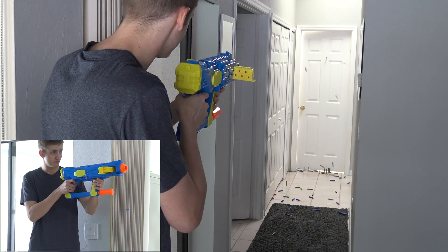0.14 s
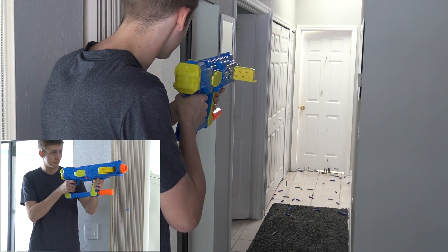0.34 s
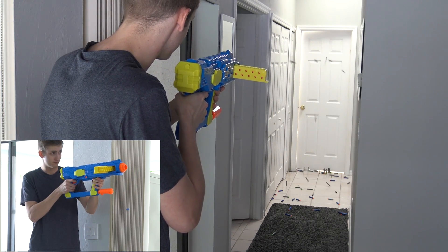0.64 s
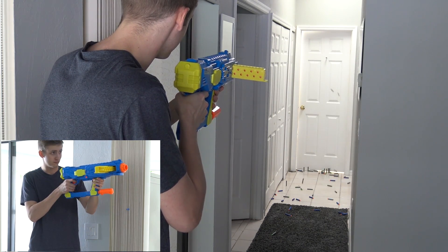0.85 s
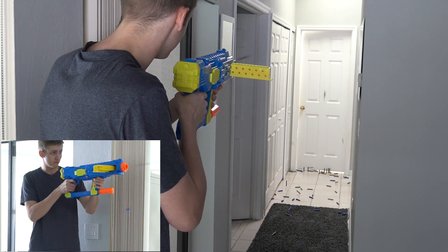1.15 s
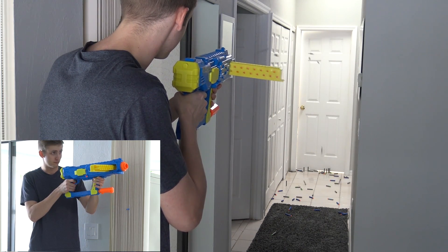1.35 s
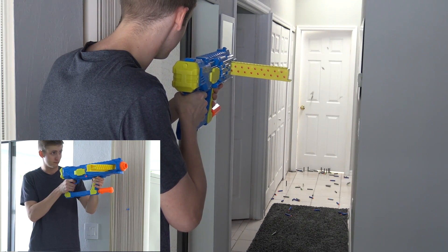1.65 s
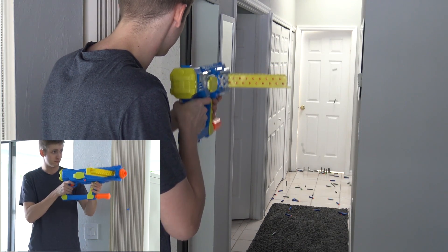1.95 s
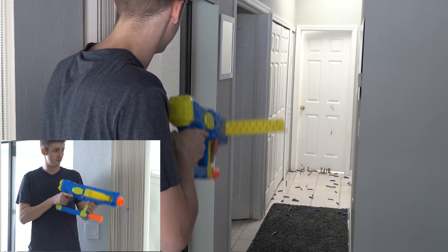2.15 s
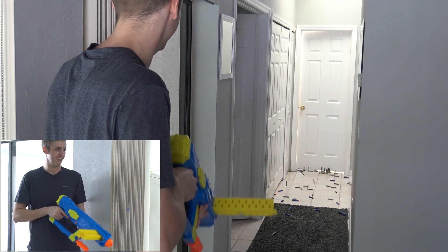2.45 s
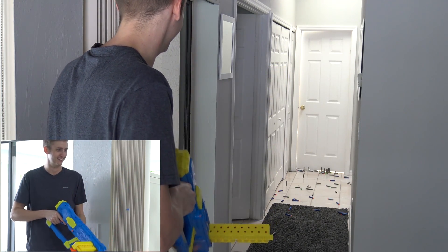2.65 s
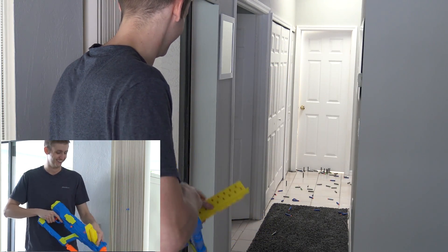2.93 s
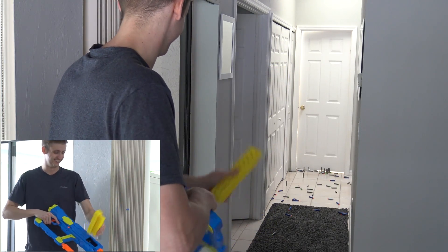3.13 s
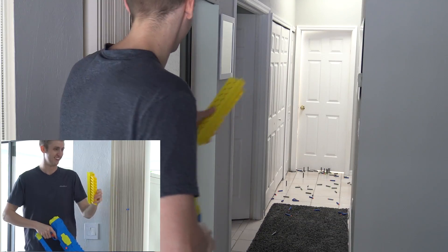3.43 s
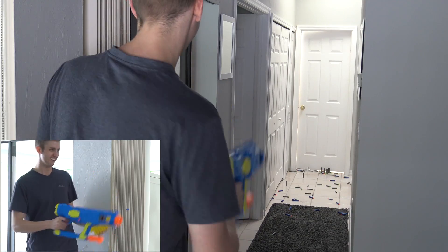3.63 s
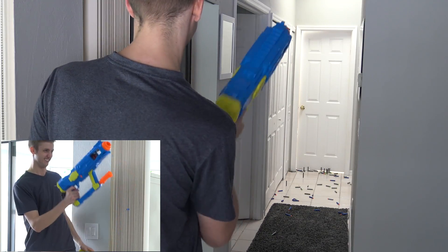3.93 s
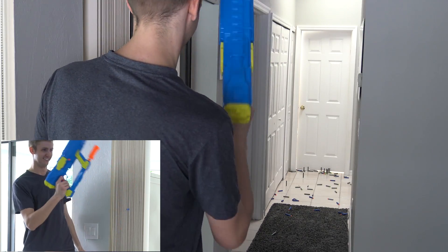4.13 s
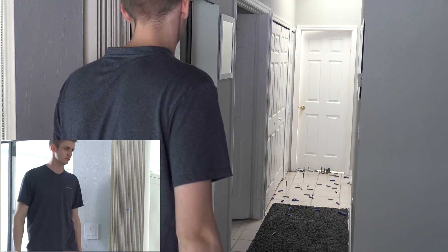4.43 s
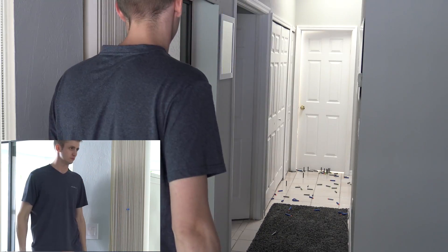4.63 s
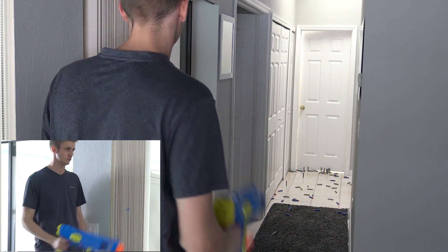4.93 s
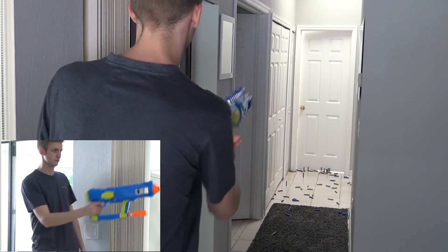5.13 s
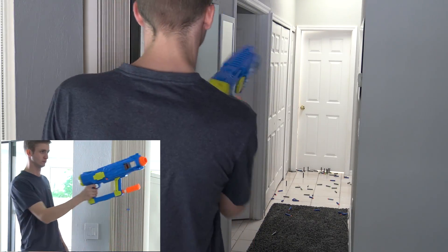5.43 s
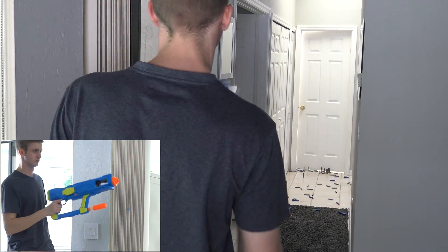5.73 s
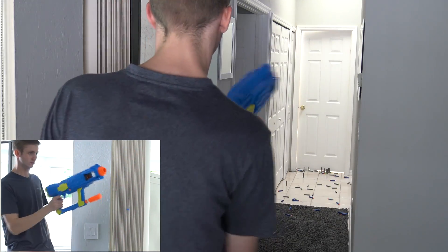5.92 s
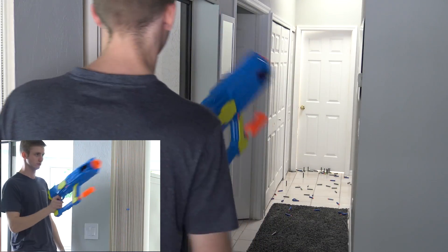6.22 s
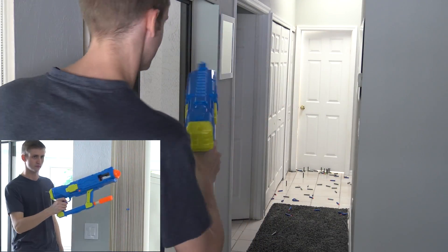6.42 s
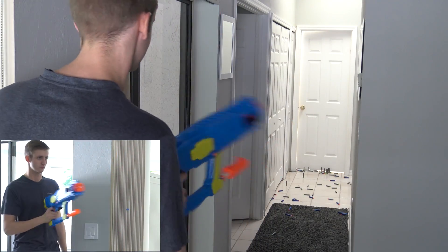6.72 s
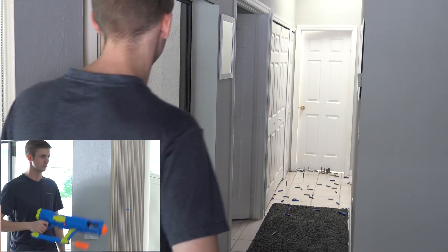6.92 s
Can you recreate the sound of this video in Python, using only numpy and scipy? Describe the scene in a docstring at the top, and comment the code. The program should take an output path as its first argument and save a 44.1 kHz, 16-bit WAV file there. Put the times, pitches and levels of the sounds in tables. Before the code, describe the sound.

Close to the microphone, a pneumatic toy blaster fires quick bursts in a bare, reverberant hallway, each shot a sharp plastic slam with an air hiss. Foam darts smack and boom on a hollow door at the far end. A magazine is pulled with hard clacks, three empty shots follow, the sound cuts abruptly to a louder hum, and then one very long, rapid dry-fire burst rattles out and leaves a ringing tail.

```python
"""Toy dart blaster in a bare hallway

A pneumatic blaster fires fast bursts of valve hiss, piston slam and low push; foam darts smack a hollow door.
Between bursts the magazine and grip clack, ping and whistle over mains hum and dull room noise.
Noise bursts excite resonances, and decaying noise bands make the hall. A limiter squeezes the shots,
so the tail swells after each one. One splice cuts the sound short, and the background steps up there."""
import sys
import numpy as np
from scipy import signal
from scipy.fft import rfft, irfft, next_fast_len
from scipy.io import wavfile

SR = 44100
rng = np.random.default_rng(int(sys.argv[2]) if len(sys.argv) > 2 else 0)


def convert_level_to_amplitude(level_db):
    """Map a level in decibels to its linear amplitude factor."""
    exponent = np.asarray(level_db, float) / 20
    return 10 ** exponent


def master_out(mix):
    """Clip the mix to full scale and print it as 16-bit PCM to the path in sys.argv[1]."""
    frames = np.transpose(np.atleast_2d(mix))
    ceiling = np.clip(frames, -1, 1)
    pcm = np.round(ceiling * 32767).astype(np.int16)
    wavfile.write(sys.argv[1], SR, pcm)


N = 311787   # length in samples
SPLICE_S = 4.503


def rms_one(x):
    """Scale to rms 1."""
    return x / np.sqrt(np.mean(x ** 2) + 1e-20)


def at_hz(points, hz):
    """Read a spectrum on a log-frequency axis."""
    point_hz, value = np.array(points).T
    return np.interp(np.log(hz), np.log(point_hz), value)


def noise(spectrum, size=N):
    """Gaussian noise shaped to a spectrum in dB per Hz, then scaled to rms 1."""
    padded = next_fast_len(size)
    hz = np.maximum(np.fft.rfftfreq(padded, 1 / SR), 1)
    white = rfft(rng.standard_normal(size), padded)
    return rms_one(irfft(white * convert_level_to_amplitude(at_hz(spectrum, hz)))[:size])


def puffs(times, db, rise_s, fall_s, hold_s=0):
    """Envelope with a straight rise, a hold and an exponential fall at each time; none passes the splice."""
    out = np.zeros(N + 4 * SR)
    rise_s, fall_s = np.maximum(rise_s, 1e-4), np.maximum(fall_s, 1e-4)
    for s, level_db, rise, fall, hold in np.broadcast(times, db, rise_s, fall_s, hold_s):
        longest_s = SPLICE_S - s if s < SPLICE_S else 3
        t = np.arange(int(min(rise + hold + fall * 10, longest_s) * SR)) / SR
        shape = np.minimum(t / rise, 1) * np.exp(-np.maximum(t - rise - hold, 0) / fall)
        out[max(round(s * SR), 0):][:len(t)] += convert_level_to_amplitude(level_db) * shape
    return out[:N]


def resonate(x, hz, width_hz):
    """One resonance with gain 1 on top."""
    r = np.exp(-np.pi * width_hz / SR)
    poles = [1, -2 * r * np.cos(2 * np.pi * hz / SR), r * r]
    return signal.lfilter([(1 - r * r) / 2, 0, (r * r - 1) / 2], poles, x + 1e-18)


def strike(modes, times, db, rise_s, fall_s, spread_db, rough=1):
    """A contact shakes every mode, each blow with strengths of its own; rough 1 crackles, 0 is one clean push."""
    luck_db = spread_db * rng.standard_normal((len(times), len(modes)))
    grit = rough * rng.laplace(size=N) + 1 - rough
    out = np.zeros(N)
    for k, (hz, width, mode_db) in enumerate(modes):
        push = grit * puffs(times, db + mode_db + luck_db[:, k], rise_s, fall_s)
        # narrow modes get more gain; neighbours have opposite signs
        out += (-1) ** k * resonate(push, hz, width) * np.sqrt(SR / 8 / width)
    return out


# background level, held from each time to the next: from_s, hum_db, room_noise_db
BACKGROUND_STEPS = [(0, -54.5, -55.5), (SPLICE_S, -45, -47.5), (6.0, -50.5, -55)]
# mains partials: pitch_hz, level_db
HUM_PARTIALS = [(60, -2), (120, -10.5)]
# dull room noise spectrum: pitch_hz, density_db_per_hz
ROOM_SPECTRUM = [(15, -22.5), (40, 1), (90, -4), (200, -6.5), (400, -8.5), (1300, -20), (3000, -27),
                 (6000, -32.5), (9000, -58), (16000, -89.5)]


def background():
    """Mains hum is a few steady sines; room noise is shaped Gaussian noise."""
    t = np.arange(N) / SR
    s, *db = np.transpose(BACKGROUND_STEPS)
    hum_db, room_db = np.array(db)[:, np.searchsorted(s[1:], t)]
    hum = sum(convert_level_to_amplitude(level_db) * np.sqrt(2) * np.sin(2 * np.pi * hz * t) for hz, level_db in HUM_PARTIALS)
    return convert_level_to_amplitude(hum_db) * hum + convert_level_to_amplitude(room_db) * noise(ROOM_SPECTRUM)


# spectrum of ticks, faint hiss and the top of the clacks: pitch_hz, density_db_per_hz
BRIGHT_SPECTRUM = [(4000, -29), (7000, 0), (11000, -4), (16000, -5)]
# faint hiss between bursts: start_s, level_db, hold_s, fall_s
FAINT_HISSES = [(.87, -44, .03, .15), (1.085, -44, .02, .1), (4.52, -70.5, .45, .3)]


def faint_hiss():
    """Bright noise swells in over 20 ms, holds and fades."""
    start, level_db, hold, fall = np.transpose(FAINT_HISSES)
    return noise(BRIGHT_SPECTRUM) * puffs(start, level_db, .02, fall, hold)


# thin whistles, perhaps leaking air: start_s, pitch_hz, level_db, rise_s, hold_s, fall_s
WHISTLE_NOTES = [(2.423, 1287, -52.5, 0.043, 0.071, 0.11), (3.656, 1480, -32, .004, 0.023, .004),
                 (3.69, 1375, -27, .008, .024, .003)]
WHISTLE_WIDTH_HZ = 66   # of each of the two passes


def whistle():
    """Air noise passes twice through a narrow resonance."""
    air = rng.standard_normal(N)
    out = np.zeros(N)
    for s, hz, level_db, rise, hold, fall in WHISTLE_NOTES:
        tone = resonate(resonate(air, hz, WHISTLE_WIDTH_HZ), hz, WHISTLE_WIDTH_HZ)
        out += rms_one(tone) * puffs(s, level_db, rise, fall, hold)
    return out


# trigger ticks: start_s, level_db
TRIGGER_TICKS = [(.42, -37), (.861, -29), (1.071, -39), (4.645, -50), (4.849, -57)]
TICK_S = .0018


def trigger_ticks():
    """Each tick is a very short burst of bright noise."""
    return noise(BRIGHT_SPECTRUM) * puffs(*np.transpose(TRIGGER_TICKS), TICK_S / 2, TICK_S)


def catch_ping():
    """The magazine catch rings in one narrow high mode."""
    mode = (5250, 180, -17)   # pitch_hz, width_hz, level_db
    return strike([mode], [3.0065], 0, 0.0012, 0.0051, spread_db=0)


# clacks of magazine and grip, and at 5.029 s the body knock of the burst's first shot:
# start_s, dull_knock_db, hard_knock_db, bright_noise_db, rise_s
CLACK_BLOWS = [(0.874, -57, -31.5, -40, 0.0057), (1.087, -46, -29, -38, .006),
               (2.33, -66.5, -47.5, -55.5, .01), (2.425, -56, -48.5, -62.5, 0.038),
               (2.981, -44.5, -58, -65, 0.0055), (3.007, -43, -36.5, -35.5, 0.0018),
               (3.011, -35.5, -34.5, -45, .006), (3.157, -36, -35, -38.5, .006),
               (3.173, -29, -16, -19.5, 0.0036), (3.631, -45, -39, -53, 0.0072),
               (3.655, -36, -35, -53, .004), (3.684, -36, -41.5, -52.5, 0.0047),
               (4.458, -48.5, -47.5, -66, .003), (4.477, -39.5, -41, -54.5, 0.0032),
               (4.489, -46, -38.5, -47.5, 0.0061), (4.648, -48, -45.5, -66, .01),
               (4.70, -55.5, -60, -72, .009), (4.848, -47, -51.5, -61.5, .001), (4.89, -59, -59, -68, .008),
               (4.96, -55.5, -68, -74, .009), (5.012, -25, -22, -40, 0.0048),
               (5.029, -14.5, -19, -29.5, 0.00061)]
# modes of the clacking plastic, low to high: pitch_hz, width_hz, level_db
CLACK_MODES = [(825, 630, 7), (1237, 210, 5.5), (1900, 780, 4), (2680, 830, 0), (3720, 440, 2),
               (4960, 520, 0), (6500, 1100, -11.5)]
CLACK_FALL_S, CLACK_FALL_PER_RISE = 0.0039, 1.58   # a slower contact also fades more slowly


def clacks():
    """A dull knock shakes the three low modes, a hard knock the upper ones; bright noise lies on top."""
    s, dull_db, hard_db, bright_db, rise = np.transpose(CLACK_BLOWS)
    fall = CLACK_FALL_S + CLACK_FALL_PER_RISE * rise
    dull = strike(CLACK_MODES[:3], s, dull_db, rise, fall, spread_db=2)
    hard = strike(CLACK_MODES[3:], s, hard_db, rise, fall, spread_db=2)
    return dull + hard + noise(BRIGHT_SPECTRUM) * puffs(s, bright_db, rise, fall)


# single dart hits with levels of their own, sharp smacks or strong door booms:
# start_s, smack_db, boom_db (the boom before its trim in darts())
SINGLE_DARTS = [(0.152, -15.5, -13.5), (0.174, -10.5, -15), (.275, -15, -14), (0.291, -12, -14),
                (0.884, -15, -22), (0.971, -15.5, -7.5), (1.05, -20, -18.5), (1.739, -16.5, -12.5),
                (1.79, -25.5, -13), (1.86, -26, -17.5), (1.93, -29.5, -20.5)]
# foam tip on the door: pitch_hz, density_db_per_hz
SMACK_SPECTRUM = [(290, -32.5), (500, -9.5), (1020, -10.5), (1140, -5.5), (1290, -10.5), (2320, -13.5),
                  (3520, -8), (5280, -15), (14000, -51.5)]
# hollow door panel modes: pitch_hz, width_hz, level_db
DOOR_MODES = [(250, 100, -7.5), (325, 43, -1.5), (421, 130, -2.5)]
FLIGHT_S, FLIGHT_SPREAD_S = .105, 0.0053
LANDING_DB, LANDING_BOOM_DB = -22.5, -21.5   # the boom before the same trim
DART_RISE_S = 0.0093


def darts():
    """Foam tips smack the hollow door, which booms; darts from the later bursts land one flight time on."""
    fired = np.array([s for *_, times in SHOT_BURSTS[1:] for s in times if s < EMPTY_FROM_S])
    landed = fired + FLIGHT_S + FLIGHT_SPREAD_S * rng.standard_normal(len(fired))
    landings = [(s, LANDING_DB, LANDING_BOOM_DB) for s in landed]
    s, smack_db, boom_db = np.transpose(SINGLE_DARTS + landings)
    smack = noise(SMACK_SPECTRUM) * puffs(s, smack_db, DART_RISE_S, 0.018)
    boom = strike(DOOR_MODES, s, boom_db - 7, DART_RISE_S, 0.017, spread_db=2.0)
    return smack + boom


# bursts of fire, levels before each part's trim: slam_db, hiss_db, push_db, shot times_s
SHOT_BURSTS = [(-3.5, -29.5, -43, [-0.005]), (2.5, -19.5, -27.5, [0.4575, 0.5077, 0.568, 0.6343]),
               (-1.5, -21.5, -30, [1.1658, 1.2188, 1.2805, 1.3344, 1.394, 1.4495]),
               (-2.5, -24, -30, [1.5251, 1.5658, 1.6163, 1.6618, 1.7147, 1.7638, 1.8193, 1.8947]),
               (1, -25, -38, [3.7287, 3.8002, 3.8906]),
               (3, -22, -24.5, [5.0286, 5.0443, 5.0868, 5.1311, 5.1729, 5.2126, 5.257, 5.3024, 5.346, 5.3915, 5.4337, 5.4805, 5.5264, 5.5704, 5.6174, 5.6624, 5.7082, 5.7602, 5.806, 5.8522, 5.9035, 5.9503, 5.998, 6.047, 6.0973, 6.1459, 6.1973, 6.2549, 6.3085, 6.3781, 6.4403, 6.5037, 6.5859])]
EMPTY_FROM_S = 3   # from here on the blaster fires without darts
SLAM_SAG_DB_PER_S, HISS_SAG_DB_PER_S, PUSH_SAG_DB_PER_S = 0.23, 1.2, 4   # loss within a burst
SHOT_SPREAD_DB = 1.0   # chance from shot to shot


def firing():
    """Time and slam, hiss and push levels of every shot: those of its burst, sagging as pressure falls."""
    rows = [(s, s - times[0], slam, hiss, push) for slam, hiss, push, times in SHOT_BURSTS for s in times]
    s, since, *db = np.transpose(rows)
    sag_db = np.outer([SLAM_SAG_DB_PER_S, HISS_SAG_DB_PER_S, PUSH_SAG_DB_PER_S], since)
    luck_db = SHOT_SPREAD_DB * rng.standard_normal((len(s), 3)).T
    return s, *(db - sag_db + luck_db)


def barrel_push():
    """Air pushed out of the barrel and the tank's thump: one puff excites two low resonances."""
    s, _, _, push_db = firing()
    puff = puffs(s - .001, push_db + 23, .001, 0.0001)
    barrel = resonate(resonate(puff, 88, 69), 88, 2 * 69)
    tank = convert_level_to_amplitude(-5) * resonate(resonate(puff, 215.5, 110), 215.5, 110)
    return signal.sosfilt(signal.butter(2, 50, "high", fs=SR, output="sos"), barrel + tank)


# valve air spectrum: pitch_hz, density_db_per_hz
VALVE_SPECTRUM = [(1000, -10.5), (2500, 2), (4000, -1), (6000, -7.5), (8000, -10.5), (11000, -13.5),
                  (14000, -15.5), (16000, -32.5)]


def valve_hiss():
    """A dart holds the air back, then frees it in a short burst; an empty barrel hisses at once and longer."""
    s, _, hiss_db, _ = firing()
    empty = s > EMPTY_FROM_S
    level_db = hiss_db + np.where(empty, 9.5, 12)
    rise, hold = np.where(empty, .0006, .004), np.where(empty, .013, .002)
    return noise(VALVE_SPECTRUM) * puffs(s, level_db, rise, 0.0055, hold)


# plastic shell modes: pitch_hz, width_hz, level_db
SHELL_MODES = [(269.5, 200, -15.5), (370, 240, -16), (502, 28, -18.5), (827.5, 130, -1), (1114, 145, -1.5),
               (1281, 117, -0.5), (1640, 296, -2), (2064, 188, -1.5), (2279, 130, -4), (2860, 1010, -4),
               (3542, 230, -2), (4530, 630, -9), (5330, 390, -6)]


def piston_slam():
    """The piston hits the shell a moment after the valve opens: one clean blow with a crackling rattle."""
    s, slam_db, _, _ = firing()
    s = s + np.where(s > EMPTY_FROM_S, .0075, .0045)
    hit = strike(SHELL_MODES, s, slam_db, .0001, .0001, spread_db=0.6, rough=0)
    rattle = strike(SHELL_MODES, s - .001, slam_db - 9.5, 0.0039, 0.0071, spread_db=1.0)
    no_bass = signal.butter(2, 210, "high", fs=SR, output="sos")   # a small shell radiates no bass
    return signal.sosfilt(no_bass, hit + rattle)


def wall_echoes(x, first_db, fade_s):
    """The near walls send back the same dulled echoes for every shot."""
    lag_s, taps = rng.uniform(.004, .06, size=16), np.zeros(SR // 8)
    at = np.minimum(lag_s * SR, len(taps) - 1).astype(int)
    taps[at] = convert_level_to_amplitude(first_db) * np.exp(-lag_s / fade_s) * rng.choice([-1, 1], size=16)
    return signal.lfilter([.3], [1, -.7], signal.fftconvolve(x, taps)[:N])


# time for the tail to fall 60 dB: pitch_hz, decay_s
HALL_DECAY = [(100, 1), (260, 0.85), (700, 0.98), (1840, 0.92), (4850, 0.78), (12800, 0.46)]
# tone of the tail: pitch_hz, level_db
HALL_TONE = [(100, -16.5), (220, -7.5), (400, -2.5), (800, -1.5), (1500, 2.5), (3000, -2), (6000, -2),
             (9000, -2), (16000, -11)]


def hallway(x, build_s):
    """Each sixth-octave band's energy fills the hall, dies at its own rate and is heard as noise.

    The splice drops all that rang before it."""
    edges, cut = 70 * 2 ** np.arange(0, 8.1, 1 / 6), round(SPLICE_S * SR)
    white = rng.standard_normal((2, N))   # neighbouring bands use different noise
    fill = np.exp(-1 / (build_s * SR))
    out = np.zeros(N)
    for k, (low, high) in enumerate(zip(edges, edges[1:])):
        hz = np.sqrt(low * high)
        band = signal.butter(2, [low, high], "band", fs=SR, output="sos")
        keep = convert_level_to_amplitude(-2 * 60 / (at_hz(HALL_DECAY, hz) * SR))   # energy kept per sample
        energy = signal.sosfilt(band, x + 1e-18) ** 2
        poles = np.convolve([1, -keep], [1, -fill])
        stored = [signal.lfilter([(1 - fill) * 10 / SR], poles, part) for part in np.split(energy, [cut])]
        envelope = np.sqrt(np.abs(np.concatenate(stored)))
        out += convert_level_to_amplitude(at_hz(HALL_TONE, hz)) * envelope * rms_one(signal.sosfilt(band, white[k % 2]))
    return out


def scene():
    """Near sounds arrive direct and wet, the far door mostly wet; the low push stays out of the hall tail."""
    bang, push = valve_hiss() + piston_slam(), barrel_push()
    near = clacks() + trigger_ticks() + faint_hiss() + catch_ping() + whistle()
    far, t = darts(), np.arange(N) / SR
    near[(t > SPLICE_S) & (t < SPLICE_S + .002)] = 0   # these are mute just after the splice
    wet = hallway(convert_level_to_amplitude(2.5) * bang + convert_level_to_amplitude(1.5) * near + convert_level_to_amplitude(4.5) * far, build_s=0.0092)
    echoes = wall_echoes(bang + convert_level_to_amplitude(-14.0) * push, first_db=-12, fade_s=0.075)
    direct = bang + push + near + convert_level_to_amplitude(-2.0) * far
    return (direct + wet + echoes + background())[None]


def roll_off(x):
    """The treble ends steeply here."""
    return signal.sosfilt(signal.butter(12, 15750, fs=SR, output="sos"), x)


def record(dry):
    """Look-ahead limiter with a steady release; the fastest peaks still clip."""
    ceiling_db, release_db_per_s, ahead = -0.4, 80, round(0.002 * SR)   # ahead in samples
    ramp = release_db_per_s * np.arange(N) / SR
    over_db = np.maximum(20 * np.log10(np.abs(dry[0]) + 1e-9) - ceiling_db, 0)
    held_db = np.maximum.accumulate(over_db + ramp) - ramp   # peak hold that falls at the release rate
    smooth = np.exp(-1 / (0.00022 * SR))
    early_db = np.append(held_db[ahead:], held_db[-ahead:])
    duck_db = signal.lfilter([1 - smooth], [1, -smooth], early_db)
    return roll_off(np.clip(dry * convert_level_to_amplitude(-duck_db), -1, 1))


dry = scene()
out = record(dry)
master_out(out)
```